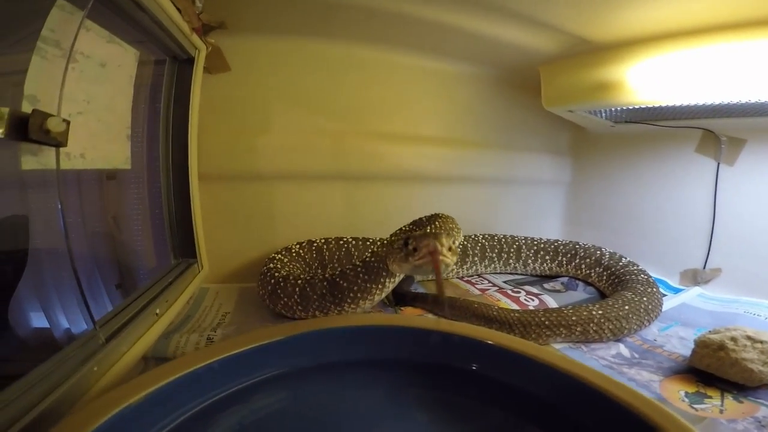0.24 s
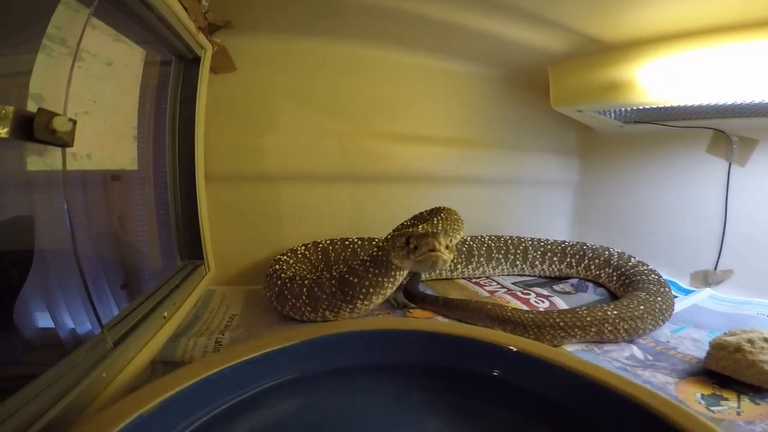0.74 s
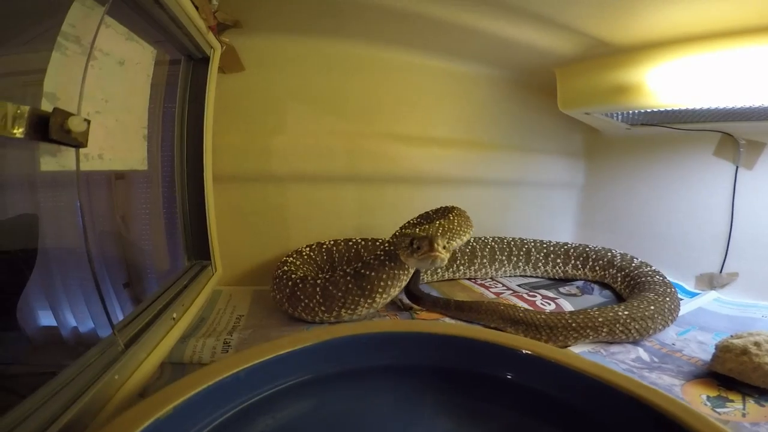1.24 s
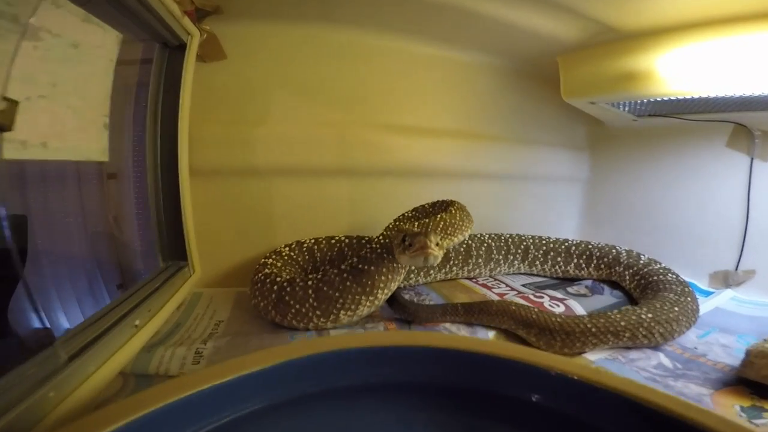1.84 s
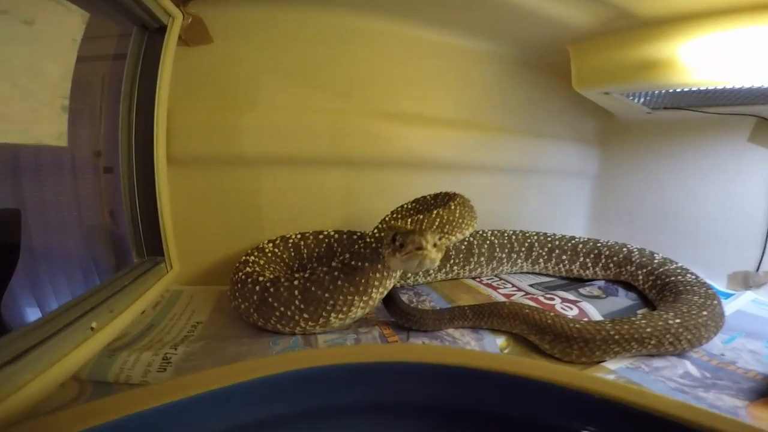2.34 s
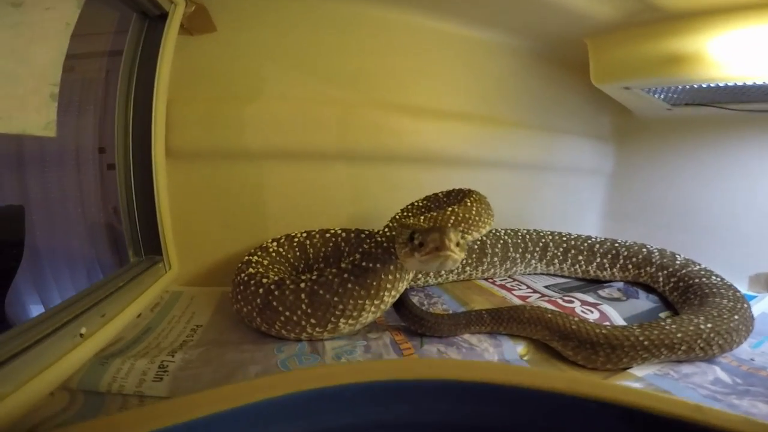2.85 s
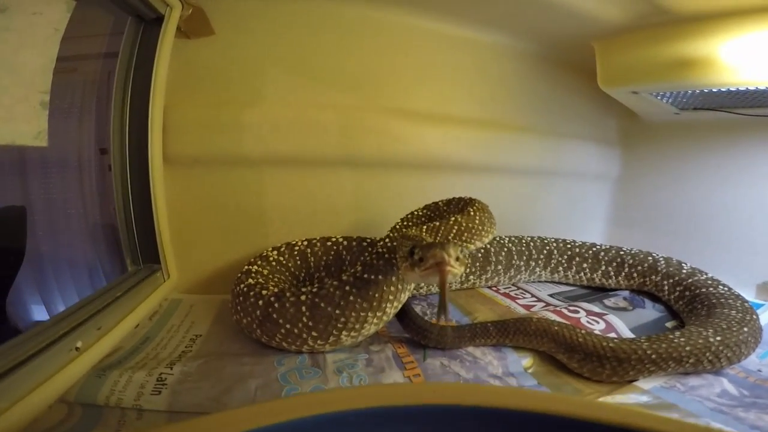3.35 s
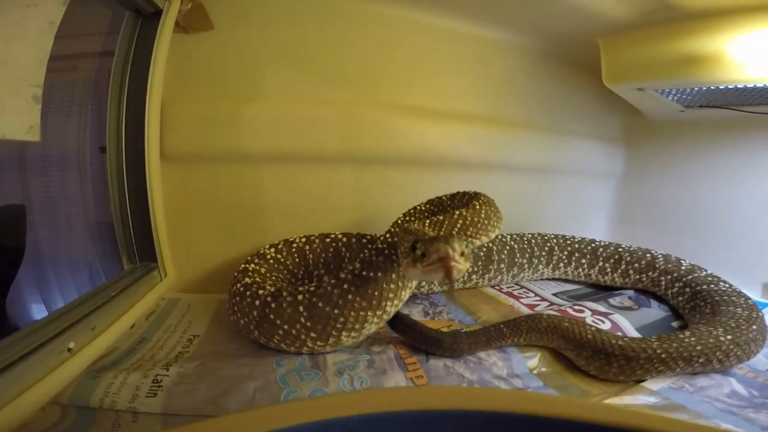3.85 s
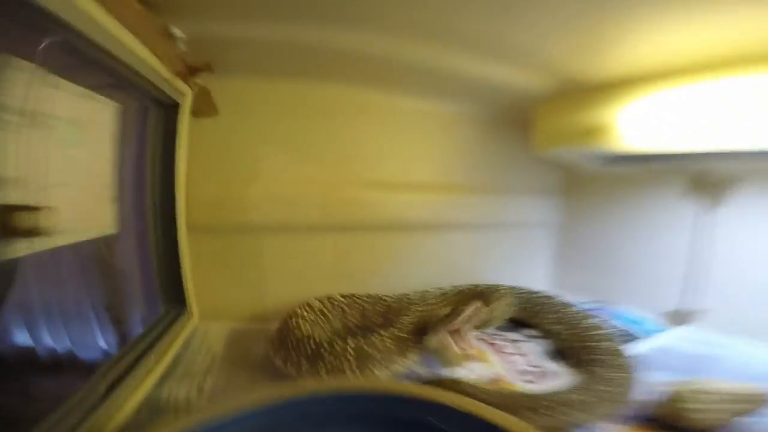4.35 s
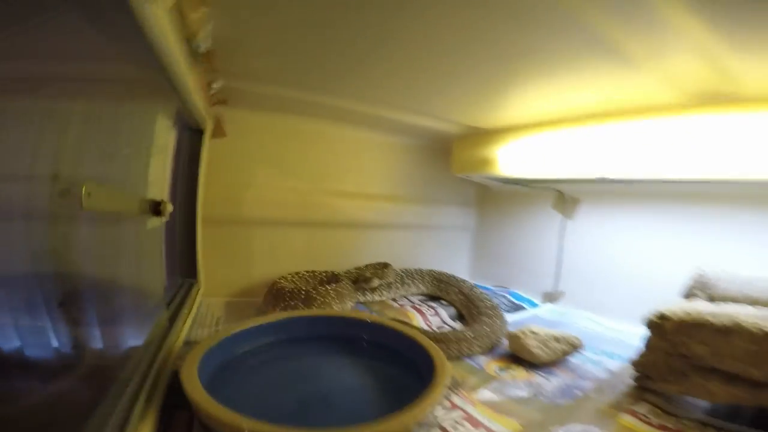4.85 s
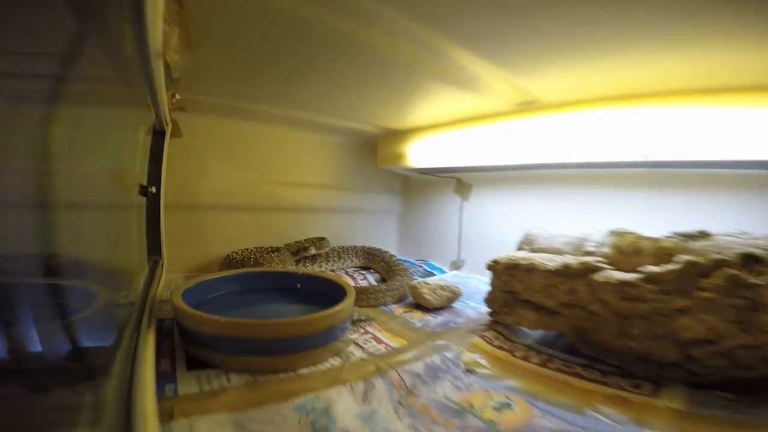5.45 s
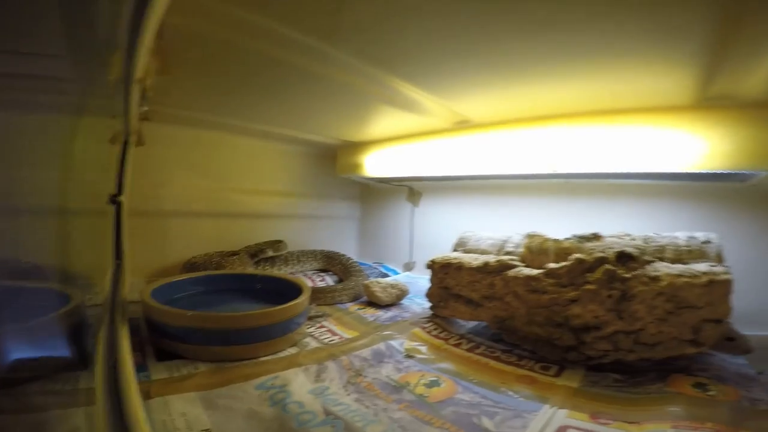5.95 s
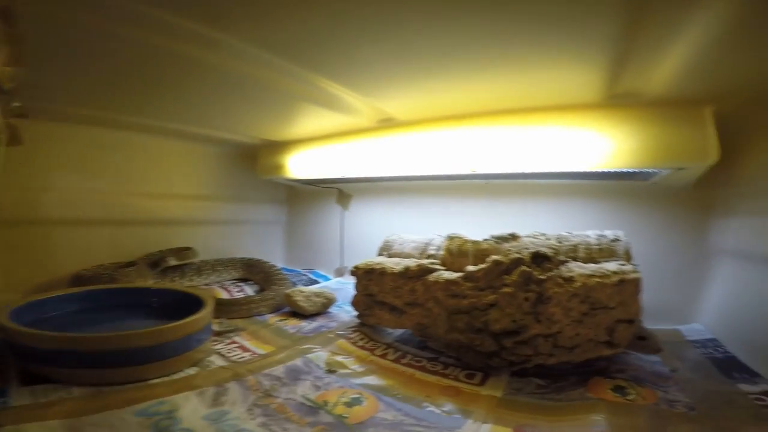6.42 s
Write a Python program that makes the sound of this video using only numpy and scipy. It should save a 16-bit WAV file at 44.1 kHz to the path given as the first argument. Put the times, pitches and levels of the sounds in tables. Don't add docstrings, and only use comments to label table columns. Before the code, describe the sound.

A rattlesnake's dry, bright buzz, about fifty shakes a second blurring into a sizzling rattle, runs throughout in a small hard enclosure. It begins faint and swells over the first second. Low lumpy handling rumble goes straight into the cased microphone. Hollow plastic knocks land at 1.3 s, then a loud juddering cluster near 1.8 s, after which the buzz ducks, with more judder at 2.0. Heavy knocks follow at 2.6 and 2.9, duller ones at 3.2 and 3.9; the buzz grows strong by 4.0. Knocks at 4.15 lead to the strike at 4.2: a massive distorted thud with splintery crunch. Short raspy scuffs over paper run to 4.7, with a clack at 4.4 and another knock at 4.87. The buzz, almost vanished, creeps back from 5.3 to the end at 6.7 over soft rumble and small bumps, with very faint hiss and high electronic whine.

```python
import sys
import numpy as np
from scipy import signal
from scipy.fft import rfft, irfft
from scipy.io import wavfile

SR = 44100
rng = np.random.default_rng(int(sys.argv[2]) if len(sys.argv) > 2 else 0)


def nominal_scale(level):
    x = np.asarray(level, float) / 20
    return 10 ** x


def materialize(psi):
    bounded = np.clip(np.atleast_2d(psi).T, -1, 1)
    quanta = np.round(bounded * 32767).astype(np.int16)
    wavfile.write(sys.argv[1], SR, quanta)


N = 294588
TIME = np.arange(N) / SR

# time in seconds, level in dB, share of the small tip segments in dB.
BUZZ = [(0, -52.5, 6), (.3, -48, 8.5), (.7, -42.5, 9), (1.15, -40, 11), (1.75, -44.5, 9), (1.85, -59.5, 11),
        (2.1, -53, 9.5), (2.6, -56.5, 7.5), (2.95, -52.5, 12), (3.4, -44, 11.5), (4.0, -39.5, 9),
        (4.195, -46, 10), (4.25, -65, 3.5), (4.68, -70.5, -1), (5.2, -68, 4), (5.93, -54, 10.5),
        (6.34, -49.5, 12), (6.68, -49.5, 11.5)]
# time in seconds, shakes per second.
TAIL_SPEED = [(0, 55), (1, 53), (3, 54), (4, 52), (6.68, 51)]
# pitch in Hz, width in Hz, level in dB.
SEGMENTS = [(3200, 120, -13), (3630, 120, -8), (3780, 130, 0), (4030, 130, 0), (4600, 200, -10),
            (5300, 130, 2), (5610, 150, 1), (5900, 150, -9), (6150, 150, -8), (6650, 200, -2),
            (7480, 320, -5), (8100, 300, -10), (10600, 500, -16)]
# frequency in Hz, level in dB per Hz.
CLATTER = [(1500, -48), (2600, -20), (3050, -20), (3250, -13.5), (3480, -16), (3650, -3), (4150, -2),
           (4500, -6), (5100, -4.5), (5500, -13), (6200, -22.5), (7500, -11), (11500, -18.5),
           (15300, -13.5)]
# frequency in Hz, level in dB per Hz.
LEAK = [(150, -37.5), (250, -21), (457, -28), (507, -25), (768, -38), (1280, -17.5), (1480, -5), (1940, 12),
        (3000, 0.5), (3900, -28), (6600, -120)]
# time in seconds, steady rumble in dB.
RUMBLE = [(0, -43.5), (1.2, -39.5), (1.7, -36.5), (2.3, -40), (2.9, -36.5), (3.3, -44), (4.1, -34.5),
          (4.7, -45), (5.2, -50.5), (6.2, -35), (6.68, -43)]
# frequency in Hz, level in dB per Hz.
RUMBLE_COLOUR = [(8.8, -33.5), (15, -2), (27, -0.5), (44, -2), (56, -4.5), (110, -20), (140, -47),
                 (240, -120)]
# time in seconds, deep swell in dB, sharper bump in dB.
JOLTS = [(0.251, -33.5, -48), (0.529, -30.5, -49), (.73, -45, -86), (.94, -45, -80), (1.35, -38.5, -49),
         (1.55, -42, -44.5), (1.63, -39.5, -51), (1.722, -34.5, -58), (1.858, -51.5, -38),
         (2.06, -47, -36.5), (2.161, -44, -56.5), (2.281, -60.5, -39), (2.481, -47.5, -43.5),
         (2.72, -33, -37), (2.83, -37.5, -54), (2.98, -38, -54), (3.29, -36, -46), (3.49, -37, -55.5),
         (3.751, -31, -57), (3.95, -44, -48), (5.26, -50, -56.5), (5.44, -51, -58), (5.72, -47.5, -42.5),
         (5.9, -43.5, -59), (6.07, -38, -50), (6.2, -34, -43.5), (6.29, -36.5, -63), (6.41, -33, -47.5),
         (6.5, -45, -56), (6.66, -32, -68)]
# start in seconds, length in seconds, judder in dB, low sway in dB,
# upper modes in dB relative to the judder.
JUDDERS = [(1.265, .012, -18, -11.5, 2), (1.284, .04, -32.5, -25, -4), (1.76, .023, -5.5, -3, 0.5),
           (1.793, .02, -5, -13, -2.5), (1.972, 0.025, -7.5, -23, -8), (2.002, .026, -11.5, -35, -8),
           (2.618, .048, -8.5, -4, -5.5), (2.878, .014, -13.5, -5, 5.5), (2.892, .034, -15, -13.5, -9.5),
           (3.195, .05, -10.5, -11, -7), (3.857, .052, -22.5, -9.5, -6), (4.148, .03, -12, -11, -0.5),
           (4.179, .011, -13, -30.5, -18.5), (4.208, .018, 9, 3, -11.5), (4.239, .034, -23.5, -14, 0.5),
           (4.395, .011, -14, -22, 9.5), (4.404, .022, -36.5, -29.5, 7), (4.864, .016, -14.5, -11, 1),
           (4.889, .018, -13.5, -27.5, 6)]
# belly modes, upper
# modes, crack between 2 and 6 kHz.
KNOCKS = [(1.269, -12, -4.5, -2.5, -37.5), (1.309, -33, -25, -18, -37), (1.757, -3, -10, -1, -34),
          (1.777, -9.5, -15.5, 0, -35.5), (1.799, -5, -26, -19, -37), (2.619, 1, 4, -7.5, -31),
          (2.879, 0, -1, -19, -41), (3.192, -15.5, 6, -8, -36), (3.856, -11.5, 9, -7, -23),
          (3.898, -24.5, 5, -15, -30), (4.149, -12, 5.5, -19.5, -19), (4.167, -11.5, -1.5, -11, -46),
          (4.259, -19.5, -1, -7.5, -32), (4.389, -11, -8, 4.5, -30.5), (4.398, -16, -10.5, 11, -36),
          (4.836, -54.5, -10, -1, -39), (4.864, -7, -1, 3.5, -17.5), (4.891, -26.5, -6.5, 13.5, -28)]
# pitch in Hz, level in dB, time to fade by 60 dB in seconds.
CASE = [(325, -18, .06), (382.3, -9, 0.045), (566, -19.5, 0.029), (622.4, -13.5, 0.05), (727, -10, 0.047),
        (784.4, -6, 0.029), (881.5, -11, 0.0041), (1079, -2, 0.023), (1195, -7, 0.019), (1412, -14, 0.018),
        (1565, -14.5, 0.029), (1713, 0, 0.024), (1866, -6.5, 0.014), (2076, -5, 0.017), (2325, -19, 0.018),
        (2494, -20, 0.035), (3184, -12, 0.026)]
# pitch in Hz, level in dB, time to fade by 60 dB in seconds.
BRACKET = [(1845, -21, .105), (2717, -35, .1)]
# start in seconds, peak in dB, pitch in Hz, time to fade by 60 dB in seconds.
THUMPS = [(1.276, -20.5, 95, 0.11), (1.767, -6, 123.1, 0.19), (2.626, -8.5, 120, 0.09),
          (2.669, -12, 53.8, 0.11), (2.88, -11, 115.7, 0.15), (2.933, -13, 54, 0.11),
          (3.246, -10.5, 60, 0.071), (3.859, -16, 44.6, 0.51), (4.395, -16.5, 104, 0.16),
          (4.868, -9, 55, 0.14)]
# start in seconds, peak in dB, pitch in Hz, time to fade by 60 dB in seconds.
BLOW = [
    (4.2135, 11.5, 82.3, .055),
    (4.222, -7.5, 24.42, .25),
]
# start in seconds, level in dB, time to fade by 60 dB in seconds.
STRIKE = [
    (4.212, -15.5, 0.021),
    (4.2215, -6.5, 0.05),
    (4.234, -29, 0.027),
    (4.393, -48.5, 0.14),
    (4.421, -34, 0.02),
    (4.691, -53.5, 0.045),
]
# start in seconds, length in seconds, level in dB,
# rasp near 4 kHz in dB relative to that level.
SCUFFS = [
    (4.259, 0.062, -45, 3.5),
    (4.346, .037, -45.5, -5),
    (4.416, 0.02, -40, 4.5),
    (4.453, 0.046, -48, 3.5),
    (4.522, 0.088, -52.5, -6),
    (4.639, 0.045, -52.5, -2.5),
    (4.69, 0.0051, -47, 6.5),
]

THROB, THROB_WANDER = 0.13, 0.05
ENCLOSURE_T60_S, ENCLOSURE_DB = .09, -7
WHINE_HZ, WHINE_UNDER_DB, WHINE_TOP_DB = 12617, 13, -65
HISS_DB, HISS_PATCHY_DB = -2, 2.5
HISS_YIELDS_DB, HISS_YIELD = -40.5, 0.33
LUMPY_DB, BUMP_DB, BUMPY_DB, JOLT_S = -1, -23, 5.0, .03
SWAY_HZ, SWAY_WIDTH_HZ = 130.6, 7.76
BELLY_FOLLOWS_SWAY, BELLY_DB = 0.41, 1.5
JUDDER_SAG_DB_S, SWAY_SAG_DB_S, UPPER_SAG_DB_S, LET_GO_DB_S = 131.5, 155.5, 152.5, 2501
SCUFF_SAG_DB_S = 42.5
BELLY_HZ = 560
UPPER_HZ = 1500
CONTACT_HZ = 2980
CUTOFF_HZ = 15520


def rms_one(x):
    return x / np.sqrt(np.mean(x ** 2) + 1e-20)


def in_time(rows):
    s, *columns = np.transpose(rows)
    return [np.interp(TIME, s, column) for column in columns]


def colour(x, spectrum):
    hz = np.arange(N // 2 + 1) * SR / N + 1
    points_hz, points_db = np.transpose(spectrum)
    level_db = np.interp(np.log(hz), np.log(points_hz), points_db)
    return rms_one(irfft(rfft(x) * nominal_scale(level_db), N))


def band(x, low_hz, high_hz, order=2):
    sos = signal.butter(order, [low_hz, high_hz], "band", fs=SR, output="sos")
    return rms_one(signal.sosfilt(sos, x))


def drift(rate):
    r = np.exp(-80 * np.pi * rate / SR)
    noise = rng.standard_normal(N // 40 + 1002)
    slow = signal.lfilter([1], [1, -2 * r, r * r], noise)[1000:]
    return np.interp(np.arange(N) / 40, np.arange(len(slow)), rms_one(slow))


def ring(hits, hz, t60):
    r = nominal_scale(-60 / (t60 * SR))
    w = 2 * np.pi * hz / SR
    return signal.lfilter([0, np.sin(w)], [1, -2 * r * np.cos(w), r * r], hits + 1e-18)


def clicks(per_s, spread_db):
    chance, size, sign = rng.random((3, N))
    height = nominal_scale(spread_db * np.minimum(-np.log(size + 1e-9), 4))
    return (chance < per_s / SR) * height * np.sign(sign - .5)


def bouts(rows, column, sag_db):
    out, after = np.zeros(N), TIME[:SR // 5]
    for row, level_db in zip(rows, column):
        start = round(row[0] * SR)
        overtime = np.maximum(after - row[1], 0)
        out[start:start + len(after)] += nominal_scale(level_db - sag_db * after - LET_GO_DB_S * overtime)
    return out


def enclosure(dry):
    tail = rng.standard_normal(SR // 5) * nominal_scale(-60 * TIME[:SR // 5] / ENCLOSURE_T60_S)
    wet = rms_one(signal.fftconvolve(dry, tail)[:N])
    return rms_one(dry) + nominal_scale(ENCLOSURE_DB) * wet


def rattle(tip_db, depth):
    shakes, = in_time(TAIL_SPEED)
    turn = 2 * np.pi * np.cumsum(shakes * (1 + .015 * drift(6.6))) / SR
    depth = np.clip(depth, 0, .6)
    rings = np.zeros(N)
    for hz, width, level_db in SEGMENTS:
        lag = .5 * rng.standard_normal()
        busy = 1 + depth * np.cos(turn + lag) + 0.13 * np.cos(2 * turn + lag)
        uneven = nominal_scale(1.1 * drift(9) + 0.95 * drift(3.2))
        hits = clicks(900 * busy, 2.2) * busy * uneven
        rings += nominal_scale(level_db) * np.sqrt(width) * rms_one(ring(hits, hz, 2.2 / width))
    busy = 1 + depth * np.cos(turn) + 0.12 * np.cos(2 * turn)
    broad = clicks(4000 * busy, 3.0) * busy
    heard = enclosure(rms_one(rings) + nominal_scale(-3.5) * colour(broad, CLATTER))
    heard = signal.sosfilt(signal.butter(3, 1550, "high", fs=SR, output="sos"), heard)
    low = signal.sosfiltfilt(signal.butter(2, 4700, fs=SR, output="sos"), heard)
    spread = rms_one(low) + nominal_scale(tip_db - 3.0) * rms_one(heard - low)
    return (spread + nominal_scale(-21) * colour(broad, LEAK)) * nominal_scale(0.74 * drift(7))


def whine_and_hiss(buzz_db):
    yielding = HISS_YIELD * np.maximum(buzz_db - HISS_YIELDS_DB, 0)
    hiss_db = HISS_DB + HISS_PATCHY_DB * drift(6.8) - yielding
    whine = np.sin(2 * np.pi * WHINE_HZ * TIME)
    hiss = nominal_scale(hiss_db) * band(rng.standard_normal(N), 220, 1700, order=1)
    return nominal_scale(np.minimum(buzz_db - WHINE_UNDER_DB, WHINE_TOP_DB)) * (whine + hiss)


def swells(column):
    marks = np.zeros(N // 40 + 1)
    marks[[int(row[0] * SR / 40) for row in JOLTS]] = nominal_scale(column)
    span = np.arange(-150, 151) * 40 / SR
    bell = np.exp(-(span / JOLT_S) ** 2)
    return np.interp(np.arange(N) / 40, np.arange(len(marks)), np.convolve(marks, bell, "same"))


def rumble():
    level_db, = in_time(RUMBLE)
    _, deep_db, bump_db = np.transpose(JOLTS)
    deep_gain = nominal_scale(level_db + LUMPY_DB * drift(12)) + swells(deep_db)
    bump_gain = nominal_scale(level_db + BUMP_DB + BUMPY_DB * drift(5.1)) + swells(bump_db)
    deep = colour(rng.standard_normal(N), RUMBLE_COLOUR)
    deep += nominal_scale(-35) * band(rng.standard_normal(N), 200, 400)
    return deep_gain * deep + bump_gain * band(rng.standard_normal(N), 39, 135, order=4)


def judder():
    _, _, slip_db, sway_db, upper_db = np.transpose(JUDDERS)
    belly_db = slip_db + BELLY_DB + BELLY_FOLLOWS_SWAY * (sway_db - slip_db)
    belly = bouts(JUDDERS, belly_db, JUDDER_SAG_DB_S)
    lower = bouts(JUDDERS, slip_db, JUDDER_SAG_DB_S)
    upper = bouts(JUDDERS, slip_db + upper_db + 5.5, JUDDER_SAG_DB_S + UPPER_SAG_DB_S)
    slips = nominal_scale(-16.5) * clicks(2500, 0.57) * np.array([belly, lower, upper])
    wobble = 2 * np.pi * np.cumsum(SWAY_HZ + SWAY_WIDTH_HZ * drift(12)) / SR
    sway = signal.lfilter([.003], [1, -.997], bouts(JUDDERS, sway_db, SWAY_SAG_DB_S))
    return slips, nominal_scale(-4.5) * sway * np.sin(wobble)


def knocks():
    blows, cracks = np.zeros((3, N)), np.zeros(N)
    for s, level_db, belly_db, upper_db, crack_db in KNOCKS:
        blows[:, round((s + .0008) * SR)] = -nominal_scale(level_db + 3 + np.array([belly_db, 0, upper_db]))
        cracks[round((s + .001) * SR)] = nominal_scale(level_db + crack_db)
    fading = signal.lfilter([1], [1, -nominal_scale(-60 / (0.018 * SR))], cracks)
    return blows, fading * band(rng.standard_normal(N), 2000, 6000)


def case(contacts):
    soft = signal.sosfilt(signal.butter(4, CONTACT_HZ, fs=SR, output="sos"), contacts)
    shell = np.zeros(N)
    for k, (hz, level_db, t60) in enumerate(CASE):
        group = int(hz > BELLY_HZ) + int(hz > UPPER_HZ)
        share = nominal_scale(level_db + 2.0 * drift(20))
        shell += (-1) ** (k // 3) * ring(soft[group] * share, hz, t60)
    shell = signal.sosfilt(signal.butter(2, 280, "high", fs=SR, output="sos"), shell)
    sharp = contacts[-1]
    loose = nominal_scale(-17.0) * (ring(sharp, 4250, .012) + nominal_scale(-9.5) * ring(sharp, 5433, 0.013))
    bracket = sum(ring(soft[-1] * nominal_scale(level_db), hz, t60) for hz, level_db, t60 in BRACKET)
    return shell + loose + bracket


def thumps():
    out = np.zeros(N)
    for s, level_db, hz, t60 in THUMPS + BLOW:
        after = np.maximum(TIME - s, 0)
        out += nominal_scale(level_db - 60 * after / t60) * np.sin(2 * np.pi * hz * after)
    return out


def strike():
    bursts = np.zeros(N)
    for s, level_db, t60 in STRIKE:
        after = np.maximum(TIME - s, 0)
        bursts += nominal_scale(level_db - 60 * after / t60) * (TIME >= s)
    return bursts * band(clicks(4200, 3.0), 1700, 6300, order=1)


def scuffs():
    _, _, level_db, rasp_db = np.transpose(SCUFFS)
    level = bouts(SCUFFS, level_db, SCUFF_SAG_DB_S)
    sharp = bouts(SCUFFS, level_db + rasp_db, SCUFF_SAG_DB_S)
    grains = clicks(900 * nominal_scale(8.0 * drift(70)), 3.5)
    body = band(grains, 720, 2500, order=3)
    rasp = band(grains, 3700, 4590, order=3) + nominal_scale(-18) * band(grains, 5200, 5900, order=3)
    singing = sum(ring(level * grains, hz, t60) for hz, _, t60 in BRACKET)
    return level * body + sharp * rasp + nominal_scale(-32) * singing


def scene():
    buzz_db, tip_db = in_time(BUZZ)
    buzz = nominal_scale(buzz_db) * rattle(tip_db, THROB + THROB_WANDER * drift(4))
    slips, sway = judder()
    blows, cracks = knocks()
    handling = rumble() + case(slips + blows) + sway + cracks + thumps() + strike() + scuffs()
    return (buzz + whine_and_hiss(buzz_db) + handling)[None]


def roll_off(x):
    return signal.sosfilt(signal.butter(12, 16030, fs=SR, output="sos"), x)


def record(dry):
    top = .93
    x = dry / (1 + np.abs(dry / top) ** 6) ** (1 / 6)
    x = signal.sosfilt(signal.cheby2(22, 60, CUTOFF_HZ, fs=SR, output="sos"), x)
    return roll_off(x)


dry = scene()
out = record(dry)
materialize(out)
```